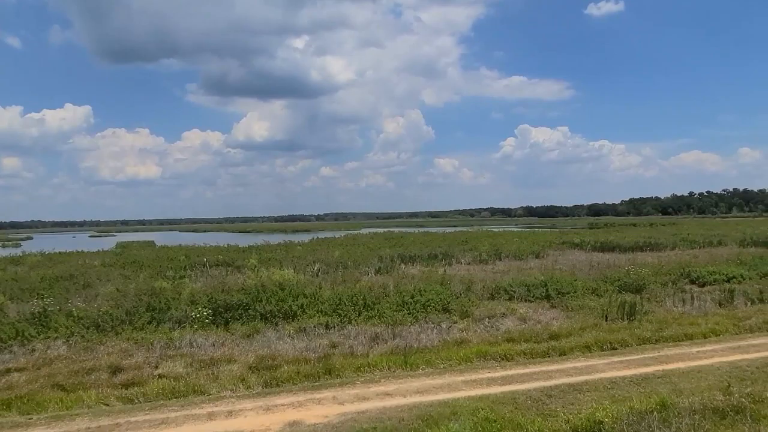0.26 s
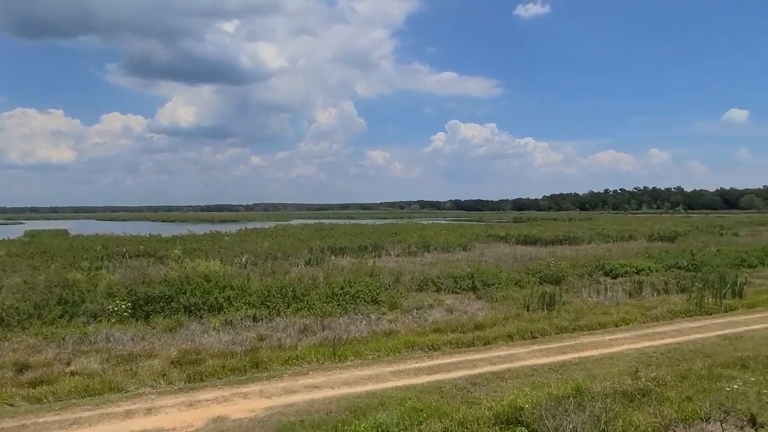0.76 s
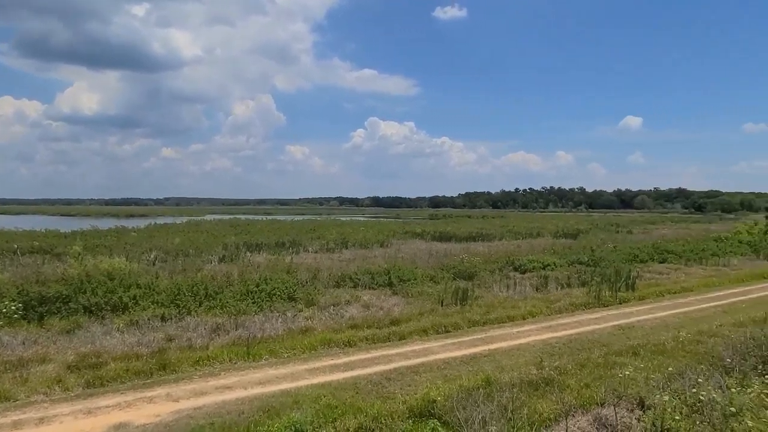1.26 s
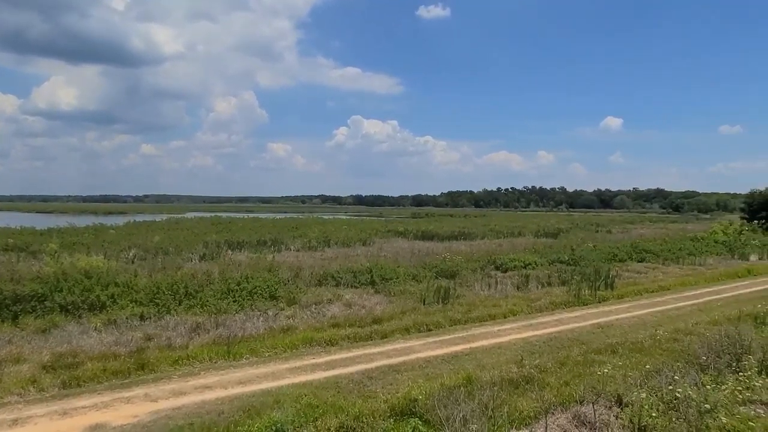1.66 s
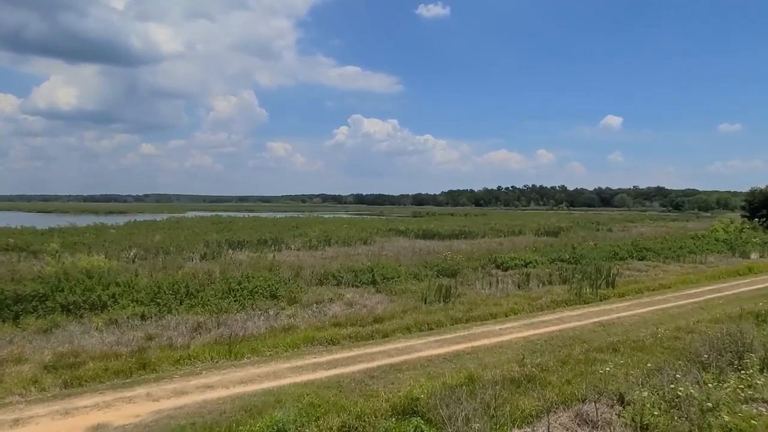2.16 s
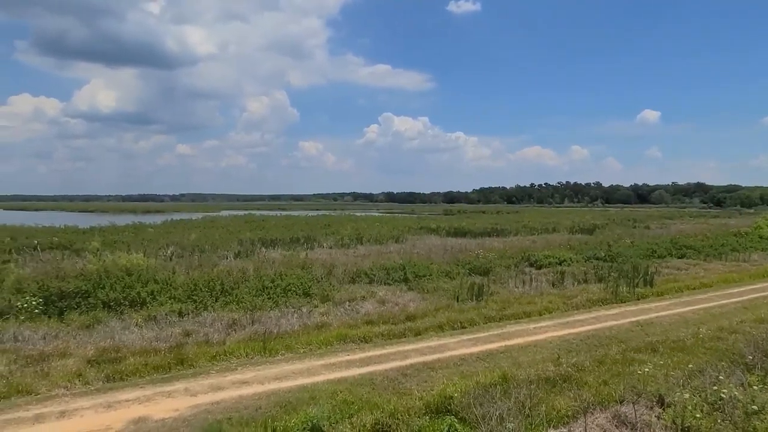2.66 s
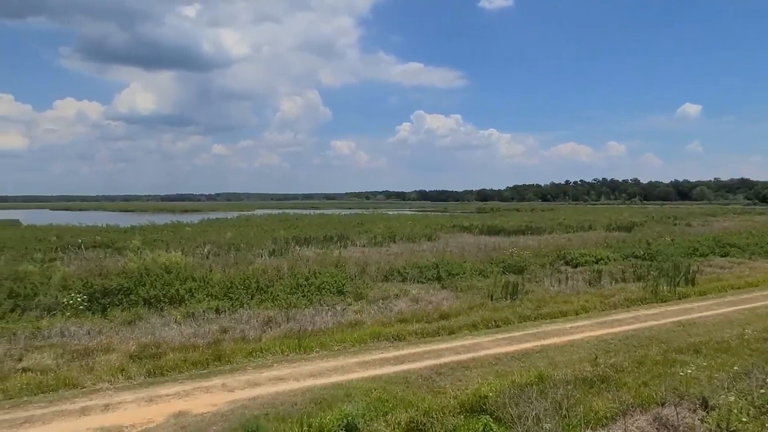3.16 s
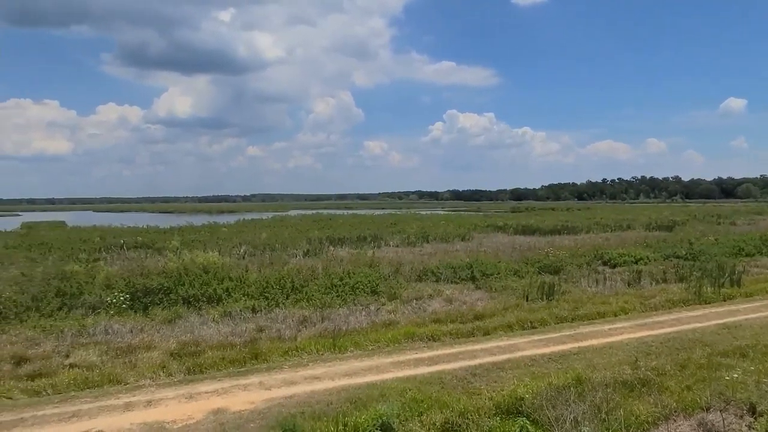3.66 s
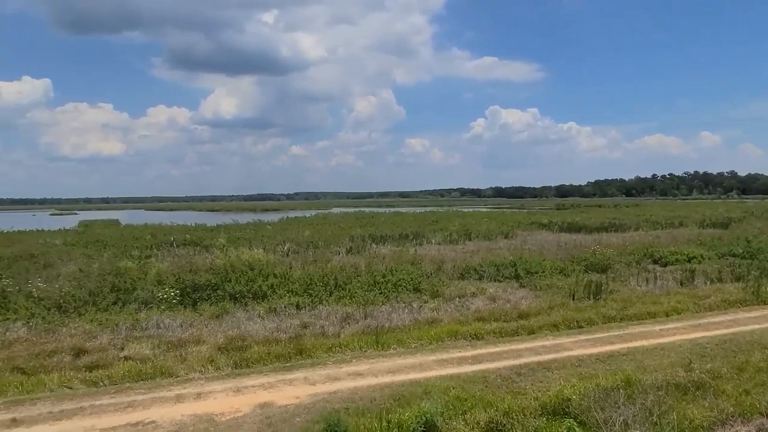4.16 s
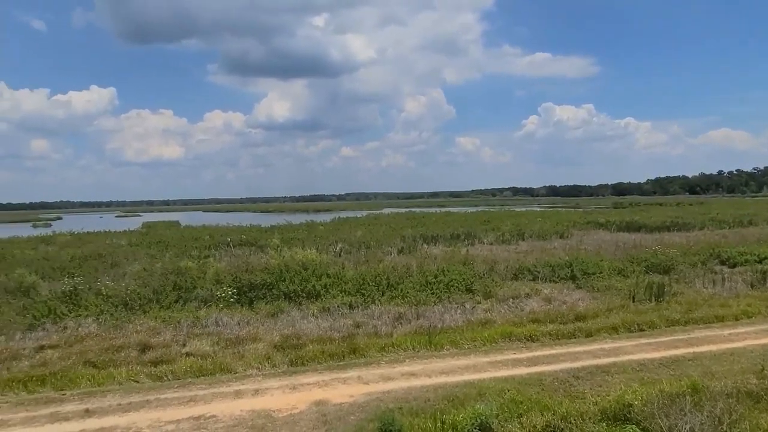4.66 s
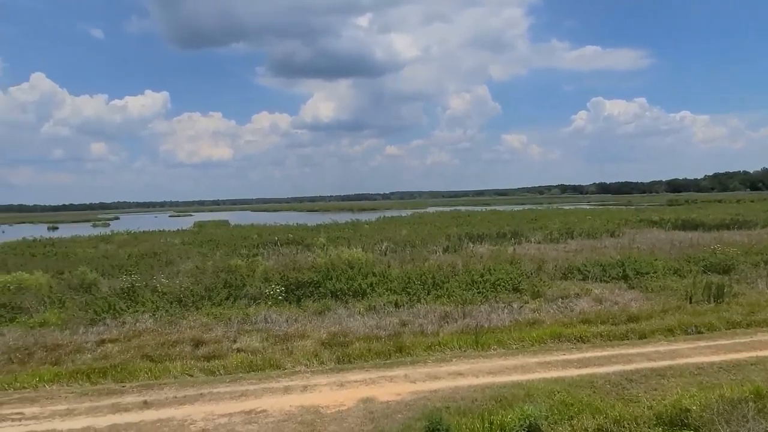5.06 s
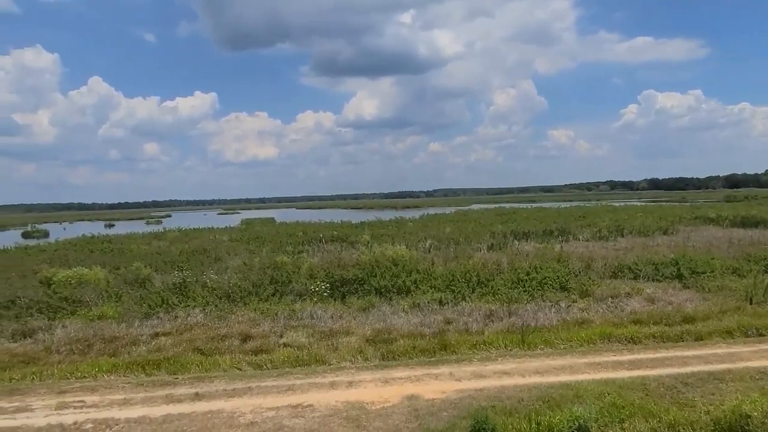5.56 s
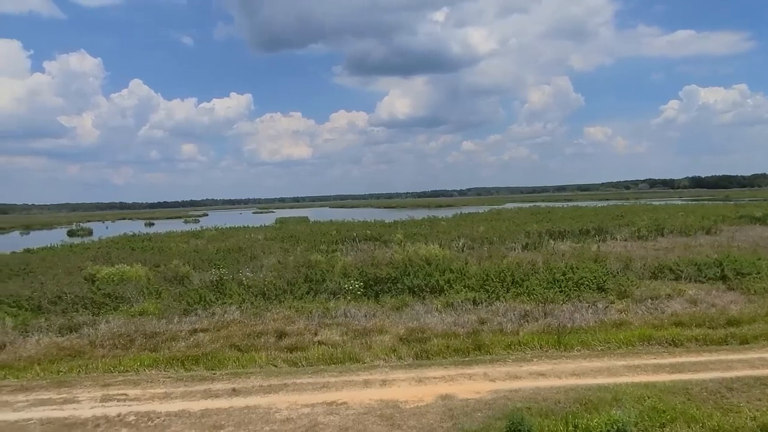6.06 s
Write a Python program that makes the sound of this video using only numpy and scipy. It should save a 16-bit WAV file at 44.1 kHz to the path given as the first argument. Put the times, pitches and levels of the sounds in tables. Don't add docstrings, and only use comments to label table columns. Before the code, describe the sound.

Wind thuds and flutters separately at the left and right microphones above a far roar and rustling reeds. Short bird whistles, dry chucks and nasal squawks scatter throughout, densest in the first half, with slight diffuse echoes. A fast, piercingly high cricket on the right surges, stumbles and stops after four seconds, leaving a fainter higher trill. Finger ticks and one plastic knock with a low thump come early; a distant low engine hum flickers underneath.

```python
import sys
import numpy as np
from scipy import signal
from scipy.fft import rfft, irfft, next_fast_len
from scipy.io import wavfile
from scipy.ndimage import uniform_filter1d, map_coordinates

SR = 44100
rng = np.random.default_rng(int(sys.argv[2]) if len(sys.argv) > 2 else 0)


def elevation(decibels):
    levels = np.asarray(decibels, float)
    return 10 ** (levels / 20)


def file_out(sig):
    cols = np.atleast_2d(sig).T
    lim = np.clip(cols, -1, 1)
    pcm = np.round(lim * 32767).astype(np.int16)
    wavfile.write(sys.argv[1], SR, pcm)


N = 277863

# time in seconds, strength in dB.
BREEZE_DB = [
    (0, 4.5),
    (.7, 1.5),
    (2.5, 0),
    (3.5, -1.5),
    (6.3, -1),
]
# peak in seconds, level in dB, half length in seconds.
GUSTS = [(0.068, -39, 0.053), (.2, -46, 0.15), (0.364, -37.5, 0.04), (0.454, -38.5, 0.037),
         (0.525, -44, 0.03), (0.85, -59, 0.19), (1.12, -51, 0.066), (1.302, -60, .25), (1.556, -55, .08),
         (1.744, -53, 0.12), (2.186, -42.5, 0.07), (2.25, -34, 0.032), (2.365, -42.5, .05),
         (2.49, -42, 0.1), (2.7, -39, 0.052), (2.903, -48, 0.12), (3.06, -46.5, 0.12), (3.18, -46.5, 0.061),
         (3.435, -52, 0.07), (3.797, -56.5, 0.42), (4.17, -62, 0.14), (4.443, -59, 0.37),
         (5.108, -48, 0.063), (5.396, -46.5, 0.12), (5.62, -48, 0.15), (5.88, -49.5, 0.099),
         (6.25, -50.5, 0.44)]
# time in seconds, left minus right in dB.
GUST_SIDE_DB = [(0.0, -11), (0.1, 8), (0.68, -7.5), (1.77, 2.5), (3.14, -8.5), (3.58, 3.5), (3.6, -6),
                (5.28, 5), (5.33, -13), (5.67, 4), (5.74, -4), (5.81, 8), (6.18, 8), (6.3, -11)]
# frequency in Hz, density in dB per Hz.
BUFFET_SPECTRUM = [(8.8, -26.5), (15, -7.5), (59, 1.5), (79, -4.5), (124, -23), (140, -20), (180, -51),
                   (310, -120)]
# frequency in Hz, density in dB per Hz.
ROAR_SPECTRUM = [(35, -42), (60, -4), (91, -3), (124, -7), (330, -14.5), (388, -16), (602, -24),
                 (1200, -37.5), (1560, -40.5), (2640, -120)]
# frequency in Hz, left-right likeness from 0 to 1.
ROAR_ALIKE = [(50, 0.45), (90, 1), (160, 0.93), (300, 0.8), (600, 0.92), (1200, 0.079)]
# frequency in Hz, density in dB per Hz.
REEDS_SPECTRUM = [(350, -6), (600, -4.5), (794, -5), (919, -6), (1660, -11.5), (2220, -18), (3070, -12.5),
                  (5270, -24.5), (7200, -32), (9360, -72), (15800, -120)]
# frequency in Hz, left-right likeness from 0 to 1.
REEDS_ALIKE = [(1000, .4), (5000, .3)]
# frequency in Hz, density in dB per Hz.
CHORUS_SPECTRUM = [(4000, -58), (6800, -13), (7790, 2.5), (8130, 1.5), (9110, 2), (9880, -2.5),
                   (10200, -2.5), (10700, -7), (10900, -9), (11500, -7.5), (15000, -30), (22000, -120)]
# frequency in Hz, density in dB per Hz.
HISS_SPECTRUM = [(4000, -36), (6000, -5.5), (11000, -20), (13000, -6.5), (16000, -11)]
# frequency in Hz, t60 in seconds.
MARSH_T60_S = [(1000, 0.43), (4000, 0.12), (10000, 0.058)]

# time in seconds, first-order level in dB.
FIRST_ORDER_DB = [(.15, -70), (.43, -45.5), (.7, -65), (.89, -56), (1.9, -57.5), (2.18, -50), (2.6, -57),
                  (3.26, -51.5), (3.65, -57), (3.93, -51), (4.29, -48), (4.74, -59.5), (4.99, -50),
                  (5.26, -54), (5.52, -48), (5.86, -55.5), (6.3, -45.5)]
# peak in seconds, level in dB, half length in seconds.
SECOND_WAVES = [(0.162, -57, 0.21), (1.073, -52, 0.1), (.45, -61, .2), (1.5, -60, 0.4),
                (3.015, -57.5, 0.33), (3.898, -61, 0.32), (4.4, -65.5, 0.3), (4.754, -60, 0.24),
                (5.24, -55, 0.23), (6.144, -56, 0.69)]
# multiple of the firing pitch, level in dB relative to the second order.
UPPER_ORDERS_DB = [(3, -14.5), (4, -30)]
# time in seconds, frequency in Hz.
FIRING_HZ = [(0, 76), (2, 76.24), (4.9, 75.9), (5.4, 76.9), (6.3, 76.76)]
# time in seconds, frequency in Hz, level in dB.
WHINE = [(3.3, 381.3, -82), (3.9, 387, -79), (4.4, 390, -84), (4.6, 392, -70.5), (4.95, 395, -77),
         (5.15, 399, -72), (5.4, 399, -84), (5.62, 400, -75), (5.85, 403, -81), (6.3, 406, -73)]
# time in seconds, frequency in Hz, level in dB.
GROAN = [(3.9, 239, -87), (4.4, 251.2, -70), (4.75, 262, -65.5), (5, 255, -73.5), (5.55, 261.5, -71),
         (5.8, 261.7, -75), (6.3, 265.3, -68.5)]

# frequency in Hz, width in Hz, level in dB.
SHELL_MODES = [(330, 150, 3), (940, 180, -3), (1350, 200, -10), (1890, 170, 0), (3330, 280, -7),
               (8600, 1800, -21)]
# start in seconds, length in seconds, centre in Hz, width in Hz, rms in dB.
SCRAPES = [(0.097, 0.015, 7650, 5500, -67.5), (0.329, 0.033, 1490, 2500, -71),
           (0.474, 0.008, 1000, 1300, -69), (0.49, 0.01, 1200, 1800, -68.5), (0.5, 0.034, 350, 600, -61),
           (.44, 0.038, 200, 300, -57.5), (1.0521, 0.011, 2300, 2600, -61.5),
           (1.054, 0.012, 6500, 8000, -64.5), (1.06, 0.047, 1600, 1600, -71),
           (0.672, 0.012, 1800, 1500, -71), (0.796, 0.018, 800, 900, -64),
           (0.801, 0.017, 4000, 4000, -74.5), (1.668, 0.043, 2000, 1500, -77),
           (3.047, 0.041, 2220, 2510, -74.5), (5.643, 0.061, 5370, 9100, -79),
           (5.584, 0.0033, 3300, 1500, -74.5), (5.814, 0.0064, 5950, 5960, -76)]
# time in seconds, peak in dB, half width in ms, push 1 or pull -1.
TAPS = [(.4762, -50, .35, -1), (.4795, -50, .35, -1), (.4906, -42, .3, -1), (.4962, -47, .25, 1),
        (.5125, -50, .3, -1), (.7969, -53, .2, 1), (.7991, -51, .2, -1), (.8009, -46, .3, -1),
        (.804, -52, .3, -1), (.8054, -50, .3, -1), (.8078, -53, .25, 1)]
# start in seconds, frequency in Hz, rms in dB.
PANEL_RINGS = [(.796, 1200, -62), (.802, 700, -60), (.491, 600, -62), (1.0572, 1900, -49.5),
               (1.0565, 3340, -56), (1.053, 930, -58), (1.058, 950, -61), (1.054, 1400, -60),
               (1.053, 2600, -63), (1.054, 3750, -61), (1.055, 340, -50), (1.061, 340, -55),
               (1.054, 1600, -59), (1.077, 600, -61)]

# share of the cycle, pitch ratio, level in dB.
NEAR_STROKE = [(0, .988, -15), (.14, .995, -8), (.3, 1, -3), (.47, 1.002, 0), (.55, 1.002, -3),
               (.66, 1, -14), (.67, .922, -13), (.77, .922, -11.5), (.93, .922, -13), (1, .922, -20)]
# share of the cycle, pitch ratio, level in dB.
HIGH_STROKE = [(0, .996, -20), (.15, .999, -4), (.3, 1, -1), (.5, 1, -2), (.68, .998, -10), (.8, .996, -24),
               (1, .996, -26)]
# time in seconds, frequency in Hz.
NEAR_WING_HZ = [(0, 8830), (.5, 8760), (.75, 8840), (.95, 8790), (1.15, 8890), (1.4, 8840), (1.75, 8920),
                (2.1, 8860), (2.7, 8890), (4.2, 8965), (4.5, 8900)]
# time in seconds, frequency in Hz.
HIGH_WING_HZ = [(2.4, 10180), (3.2, 10300), (4.4, 10370), (5.5, 10360), (6.3, 10410)]
# time in seconds, frequency in Hz.
LOW_WING_HZ = [(0, 8600), (3, 8635), (4.8, 8600)]
# peak in seconds, level in dB.
NEAR_SURGES_DB = [(0.139, -69.5), (.72, -66.5), (1.1, -70), (1.5, -72), (2, -70.5), (2.3, -71), (2.85, -76),
                  (3.12, -70.5), (3.62, -74), (4.1, -69.5), (4.36, -64.5)]
# time in seconds, level in dB.
HIGH_CRICKET_DB = [(2.2, -97), (2.71, -87), (3.22, -95), (4.39, -87), (4.76, -81), (5.56, -85), (5.86, -79),
                   (6.3, -81)]
# time in seconds, level in dB.
LOW_CRICKET_DB = [(0, -75), (1.5, -79), (3, -75.5), (4.3, -100), (4.8, -75), (4.9, -105)]
# time in seconds, level in dB relative to the trill.
LAST_STROKES = [
    (4.399, -2),
    (4.532, -4),
    (4.548, -1),
    (4.579, -7),
    (4.652, -14),
]
MISSED_STROKES_S = [4.301]

# start in seconds, length in seconds, centre in Hz, rms in dB.
CHUCKS = [(0.043, 0.11, 3020, -80), (1.068, 0.047, 3100, -71), (1.364, 0.11, 3160, -75),
          (1.56, 0.088, 4140, -76.5), (1.632, 0.13, 4050, -78), (1.789, 0.084, 4120, -78),
          (3.45, 0.12, 3920, -79), (3.84, .08, 4200, -80), (3.709, .06, 4050, -78),
          (4.83, 0.075, 4170, -81), (5.304, 0.14, 3570, -80), (6.196, 0.089, 3590, -80),
          (4.998, .04, 2790, -72), (5.345, .01, 3490, -70), (5.44, .016, 3950, -74),
          (0.454, .05, 2750, -74), (4.303, 0.15, 1320, -79), (6.221, 0.066, 1805, -78),
          (2.525, 0.035, 4000, -81), (2.665, .04, 3900, -79), (3.026, .05, 4200, -79),
          (5.832, 0.079, 3900, -79)]
# start in seconds, length in seconds, top in Hz, rms in dB.
ARCHES = [
    (0.567, 0.05, 4210, -75.5),
    (1, .032, 3990, -72),
    (1.522, 0.06, 3550, -73),
    (1.637, .045, 3600, -73),
    (1.863, 0.045, 3980, -70.5),
    (5.811, 0.082, 4050, -79.5),
]
# start in seconds, length in seconds, first Hz, last Hz, rms in dB.
NOTES = [(2.333, 0.02, 2600, 3200, -65), (0.9, 0.03, 3900, 3350, -67.5), (1.126, 0.038, 3000, 2720, -61),
         (1.627, 0.065, 2510, 2420, -76), (1.682, 0.014, 3000, 2300, -73), (1.836, 0.025, 2600, 2300, -66),
         (2.004, 0.027, 3650, 3350, -63.5), (2.043, 0.03, 3600, 3280, -74), (2.313, 0.027, 2500, 2550, -66),
         (2.518, .025, 3400, 3000, -67), (2.66, 0.027, 2930, 3120, -71), (3.858, 0.04, 4780, 4000, -77.5),
         (3.993, 0.043, 3440, 3350, -70.5), (4.358, .05, 4200, 4700, -79), (4.837, .03, 2900, 3260, -72),
         (4.954, 0.035, 3940, 3300, -76), (4.997, 0.036, 3350, 3200, -64), (5.04, 0.085, 3080, 3020, -75),
         (5.431, 0.033, 2200, 5000, -79), (5.819, .044, 3047, 3000, -72), (5.86, 0.049, 4500, 3470, -74.5),
         (5.352, 0.042, 3230, 2950, -59.5), (6.278, 0.026, 3700, 2500, -76), (2.313, .03, 990, 1500, -69),
         (2.316, .03, 4900, 4580, -75), (3.996, 0.026, 1600, 1340, -68.5), (5.215, .03, 2220, 2250, -77),
         (5.03, 0.034, 2550, 2550, -71), (5.376, .03, 2950, 2500, -69), (5.351, .045, 3950, 3900, -79),
         (1.79, 0.043, 4600, 4050, -78), (0.42, .03, 2300, 3700, -74), (5.715, .035, 3220, 3200, -79),
         (5.99, .03, 3180, 3200, -78), (5.66, .025, 2230, 2180, -78), (3.148, .025, 3400, 3000, -75),
         (0.754, .026, 3930, 3600, -70), (0.783, .014, 3750, 3750, -72), (1.163, .035, 2750, 2750, -72),
         (2.11, 0.024, 4010, 3400, -66), (3.45, .045, 3600, 4030, -77), (3.495, .035, 4500, 4200, -79),
         (3.528, .028, 4050, 3800, -79), (3.705, .022, 4280, 4150, -74), (3.721, 0.043, 4150, 3800, -75),
         (3.7, .035, 3250, 3420, -77), (4.858, .03, 4700, 4150, -81), (4.86, .02, 3850, 3900, -81)]
# start in seconds, top in Hz, tone in dB, rasp in dB.
CHIPS = [(.654, 4005, -66, -76), (1.004, 3920, -80, -78), (1.998, 4000, -74, -82),
         (2.256, 3830, -68.5, -74), (2.381, 3870, -67.5, -78), (2.529, 4120, -79, -78.5),
         (2.664, 3930, -78, -79), (2.804, 4000, -86, -79.5), (3.812, 3900, -72, -75),
         (3.959, 3930, -75, -77), (4.122, 3950, -74.5, -84), (4.385, 3710, -74, -81),
         (4.485, 3840, -73.5, -84), (4.686, 4250, -76, -90)]
# start in seconds, length in seconds, pitch in Hz, throat in Hz, rms in dB.
SQUAWKS = [
    (0.437, 0.046, 430, 3410, -65.5),
    (1.383, 0.045, 622, 3210, -68.5),
    (2.305, 0.041, 584, 3460, -61),
    (3.986, 0.05, 535, 3310, -71.5),
    (4.999, 0.042, 515, 2660, -62),
    (5.349, 0.043, 610, 3230, -67),
]


def unit(x):
    return x / np.sqrt(np.mean(x ** 2) + 1e-20)


def along(points, hz):
    f, v = np.transpose(points)
    return np.interp(np.log(hz + 1), np.log(f + 1), v)


def curves(rows):
    s, *cols = np.transpose(rows)
    return [np.interp(np.arange(N) / SR, s, c) for c in cols]


def swells(calm_db, rows):
    s, db, half_s = np.transpose(rows)[:, :, None]
    drop_db = 12 * abs(np.arange(N) / SR - s) / half_s
    peaks = elevation(db - drop_db)
    return 10 * np.log10(elevation(calm_db) ** 2 + np.sum(peaks ** 2, axis=0))


def wobble(rate_hz):
    knots = rng.standard_normal(int(N * rate_hz / SR) + 4)
    return map_coordinates(knots, [np.arange(N) * rate_hz / SR])


def phase(hz):
    return 2 * np.pi * np.cumsum(hz) / SR


def filtered(x, response):
    m = next_fast_len(x.shape[-1] + 8192)
    spectrum = rfft(x, m) * response(np.fft.rfftfreq(m, 1 / SR))
    return irfft(spectrum, m)[..., :x.shape[-1]]


def rush(spectrum, alike, patchy_db, lag_ms):
    z = signal.stft(rng.standard_normal((2, N)), nperseg=512)[2]
    field = uniform_filter1d(rng.standard_normal(z.shape[1:]), size=6, axis=0)
    field = uniform_filter1d(field, size=12, axis=1)
    pair = signal.istft(z * elevation(patchy_db * unit(field)), nperseg=512)[1][:, :N]

    def mid_side(hz):
        turn = np.arccos(np.clip(along(alike, hz), -1, 1)) / 2
        return elevation(along(spectrum, hz)) * [np.cos(turn), np.sin(turn)]

    mid, side = filtered(pair, mid_side)
    left = np.roll(mid + side, round(lag_ms * SR / 1000))
    return unit(np.array([left, mid - side]))


def placed(x, pan_db, lag_ms):
    left = np.roll(x, round(lag_ms * SR / 1000)) * elevation(pan_db / 2)
    return np.array([left, x * elevation(-pan_db / 2)])


def add(out, s, sound, pan_db):
    start = round(s * SR)
    lag = round(np.clip(-pan_db * 9, -22, 22))
    out[0, start + lag:][:len(sound)] += elevation(pan_db / 2) * sound
    out[1, start:][:len(sound)] += elevation(-pan_db / 2) * sound


def whistle(length_s, first_hz, middle_hz, last_hz, db, rough):
    u = np.linspace(0, 1, round(length_s * SR))
    knots = rng.standard_normal((2, 40))
    shake, fade = [np.interp(u * length_s * 300, np.arange(40), row) for row in knots]
    bend = np.polyfit([0, .5, 1], [first_hz, middle_hz, last_hz], deg=2)
    glide_hz = np.polyval(bend, u) + 95 * rough * shake
    swell = np.sin(np.pi * u ** 0.89) ** 0.89 * elevation(db + 2.0)
    return swell * elevation(4 * rough * fade) * np.sin(phase(glide_hz))


def puff(length_s, hz, width_hz, db):
    noise = rng.standard_normal(SR // 4)
    noise = unit(filtered(noise, lambda f: np.exp(-((f - hz) / (0.63 * width_hz)) ** 2)))
    u = np.arange(SR // 4) / SR / length_s
    return elevation(db + 3.5) * noise * np.clip(u / 0.24, 0, 1) * np.exp(-1.1 * u ** 3)


def wind():
    buffet_db = swells(-59, GUSTS)
    breeze_db = curves(BREEZE_DB)[0]
    roar_db = -64 - 0.12 * breeze_db
    reeds_db = -74 + breeze_db
    chorus_db = -80 + 0.17 * breeze_db
    gust = wobble(12)

    lumps = elevation(0.39 * np.array([wobble(4.8), wobble(9.9)]))
    side_db = np.outer([.5, -.5], curves(GUST_SIDE_DB)[0])
    buffet = rush(BUFFET_SPECTRUM, [(30, 0.047), (100, 0.29)], patchy_db=1.0, lag_ms=.02)
    buffet = elevation(buffet_db + side_db) * unit(lumps * buffet)

    roar = rush(ROAR_SPECTRUM, ROAR_ALIKE, patchy_db=1.0, lag_ms=0.32)
    roar = elevation(roar_db + 8 + 0.35 * gust) * roar
    reeds = rush(REEDS_SPECTRUM, REEDS_ALIKE, patchy_db=1.37, lag_ms=.48)
    reeds = elevation(reeds_db + 7.5 + 0.32 * gust) * reeds
    chorus = rush(CHORUS_SPECTRUM, [(8000, .3)], patchy_db=.8, lag_ms=.48)
    chorus = elevation(chorus_db + 5.0) * chorus
    hiss = rush(HISS_SPECTRUM, [(8000, .05)], patchy_db=.1, lag_ms=.02)
    hiss = elevation(-82.5 + 0.83 * (reeds_db + 75.5)) * hiss

    far = elevation([[-.5], [.6]]) * (roar + reeds)
    return buffet + far + elevation([[-.9], [.9]]) * chorus + elevation([[-.6], [.6]]) * hiss


def engine():
    first_db = curves(FIRST_ORDER_DB)[0]
    second_db = swells(-66, SECOND_WAVES)
    turn = phase(curves(FIRING_HZ)[0]) + 0.5 * wobble(5)
    tone = elevation(first_db - 1.5 + 0.077 * wobble(4.9)) * np.sin(turn)
    tone = tone + elevation(second_db - 1.8 + 0.48 * wobble(8.2)) * np.sin(2 * turn + 0.59)
    for k, db in UPPER_ORDERS_DB:
        tone = tone + elevation(second_db + db + 2.5 * wobble(5)) * np.sin(k * turn)
    hz, db = curves(WHINE)
    tone = tone + elevation(db + 2 * wobble(4)) * np.sin(phase(hz) + .3 * wobble(6))
    hz, db = curves(GROAN)
    tone = tone + elevation(db + 3 * wobble(8)) * np.sin(phase(hz) + 1.5 * wobble(14))
    return placed(np.sqrt(2) * tone, pan_db=-1.0, lag_ms=.3)


def marsh(x):
    hz, t, z = signal.stft(rng.standard_normal((2, SR // 3)), SR, nperseg=256)
    decay = elevation(-60 * t / along(MARSH_T60_S, hz)[:, None])
    tail = signal.istft(z * decay, SR, nperseg=256)[1]
    tail = tail / np.linalg.norm(tail[0])
    return signal.fftconvolve(np.pad(x, (300, 0))[None], tail, axes=1)[:, :N]


def shell(f):
    response = 0.12 / (1 + (f / 6000) ** 2)
    for k, (hz, width_hz, db) in enumerate(SHELL_MODES):
        damping = 1j * f * width_hz
        response = response + (-1) ** k * elevation(db) * damping / (hz * hz - f * f + damping)
    return response


def knock():
    t = np.arange(SR // 6) / SR
    noise = rng.standard_normal(len(t)) + .5 * rng.standard_normal((2, len(t)))
    force = .55 * (t < .004) + (t > .0035) * np.exp(-t / .004 + .7)
    blow = .7 * np.exp(-((t - .0037) / .0001) ** 2)
    ring = filtered(noise * force + blow, shell)
    cycles = 75 * t + .22 * (1 - np.exp(-(t / .005) ** 2))
    thump = np.sin(2 * np.pi * cycles) * elevation(-60 * t / .17)
    return elevation(-42) * ring / np.abs(ring).max() + elevation(-33.0) * thump


def camera():
    out = np.zeros((2, N + SR))
    for s, *scrape in SCRAPES:
        add(out, s, puff(*scrape), pan_db=0)
    for s, hz, db in PANEL_RINGS:
        add(out, s, whistle(.0075, hz, hz, .97 * hz, db, rough=.5), pan_db=0)
    tap_ms = (np.arange(200) / SR - .002) * 1000
    for s, db, half_ms, way in TAPS:
        add(out, s - .002, way * elevation(db) * np.exp(-(tap_ms / half_ms) ** 2), pan_db=0)
    bump = knock()
    out[:, round(1.0545 * SR):][:, :bump.shape[1]] += bump
    return out[:, :N]


def trill(db, wing_hz, stroke, cycle, strength, scatter_db, pan_db, lag_ms):
    count, share = cycle.astype(int), cycle % 1
    chance = rng.standard_normal((count.max() + 1, 3))[count]
    at, ratio, shape_db = np.transpose(stroke)
    pitch_hz = curves(wing_hz)[0] * np.interp(share, at, ratio) * (1 + .003 * chance[:, 0])
    wing = elevation(np.interp(share, at, shape_db) + scatter_db * chance[:, 1])
    wing = unit(wing * np.sin(phase(pitch_hz) + 1.2 * chance[:, 2]))
    return placed(elevation(db) * strength * wing, pan_db, lag_ms)


def near_cricket():
    t = np.arange(N) / SR
    rate_hz = 74.15
    cycle = (t - 4.3079) * rate_hz + 400 + .04 * wobble(3.8)
    strength = 1. * (t < 4.373)
    for s in MISSED_STROKES_S:
        strength[abs(t - s) < .5 / rate_hz] = .15
    for s, db in LAST_STROKES:
        one = abs(t - s) < .5 / rate_hz
        strength[one] = elevation(db)
        cycle[one] = 500 + s * 20 // 1 + 0.49 + (t[one] - s + 0.003) * rate_hz * 0.53
    surge_db = swells(-75.5, [(s, db, 0.33) for s, db in NEAR_SURGES_DB])
    strength = strength * elevation(-5.5 + 1.06 * wobble(9))
    return trill(surge_db, NEAR_WING_HZ, NEAR_STROKE, cycle, strength,
                 scatter_db=1.5, pan_db=-13.0, lag_ms=.48)


def crickets():
    t = np.arange(N) / SR
    high_cycle = t * 91.0 + 5 + 0.024 * wobble(3.3)
    fade_in = np.clip((t - 2.1) / 0.33, 0, 1)
    high = trill(curves(HIGH_CRICKET_DB)[0], HIGH_WING_HZ, HIGH_STROKE, high_cycle, fade_in,
                 scatter_db=1.5, pan_db=3.0, lag_ms=.12)
    low_cycle = t * 70.3 + 5 + 0.033 * wobble(10.0)
    low = trill(curves(LOW_CRICKET_DB)[0], LOW_WING_HZ, HIGH_STROKE, low_cycle, 0.51,
                scatter_db=2.0, pan_db=6.0, lag_ms=.45)
    return near_cricket() + high + low


def squawk(length_s, pitch_hz, throat_hz, db):
    throat_width_hz, crop_hz, crop_db = 420, 1350, -71
    sag = 0.985
    sound = puff(length_s, throat_hz, 1400, db - 10)
    for k in range(2, 9):
        hz = k * pitch_hz
        throat = 1 / (1 + ((hz - throat_hz) / throat_width_hz) ** 2) ** 1.3
        crop = elevation(crop_db - db) / (1 + ((hz - crop_hz) / throat_width_hz) ** 2)
        tone = whistle(length_s, hz / sag ** .5, hz, hz * sag ** .5, db, rough=.5)
        sound[:len(tone)] += (throat + crop) * tone
    return sound


def chip(hz, db, rasp_db):
    sound = puff(0.046, 0.89 * hz, 1800, rasp_db)
    head = whistle(.021, 0.83 * hz, hz, .88 * hz, db, rough=0.31)
    tail = whistle(0.018, .88 * hz, .7 * hz, 0.45 * hz, db - 13, rough=0.54)
    sound[:len(head)] += head
    sound[round(.6 * len(head)):][:len(tail)] += tail
    return sound


def birds():
    out = np.zeros((2, N + SR))
    for s, length_s, hz, db in CHUCKS:
        add(out, s, puff(length_s, hz, .33 * hz, db), pan_db=-0.5)
    for s, length_s, hz, db in ARCHES:
        add(out, s, whistle(length_s, .8 * hz, hz, .8 * hz, db, rough=0.39), pan_db=-8.5)
    for s, length_s, first_hz, last_hz, db in NOTES:
        middle_hz = (first_hz + last_hz) / 2
        rough = 0.037 * (-52 - db)
        add(out, s, whistle(length_s, first_hz, middle_hz, last_hz, db, rough), pan_db=-8.0)
    for s, *call in CHIPS:
        add(out, s, chip(*call), pan_db=-8.0)
    for s, *call in SQUAWKS:
        add(out, s, squawk(*call), pan_db=-1.6)
    return out[:, :N]


def scene():
    calls, wings = birds(), crickets()
    echoes = marsh(elevation(-9.5) * calls.mean(axis=0) + elevation(-3.0) * wings.mean(axis=0))
    return wind() + engine() + echoes + camera() + wings + calls


def low_pass(x):
    return signal.sosfilt(signal.butter(12, 15700, fs=SR, output="sos"), x)


def record(dry):
    return low_pass(dry)


dry = scene()
out = record(dry)
file_out(out)
```